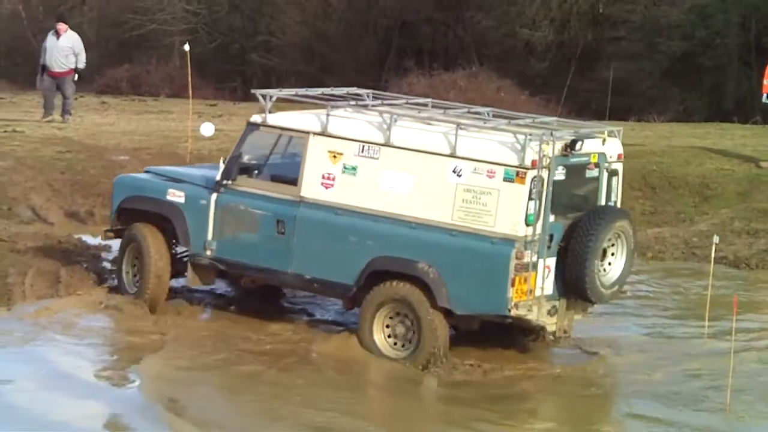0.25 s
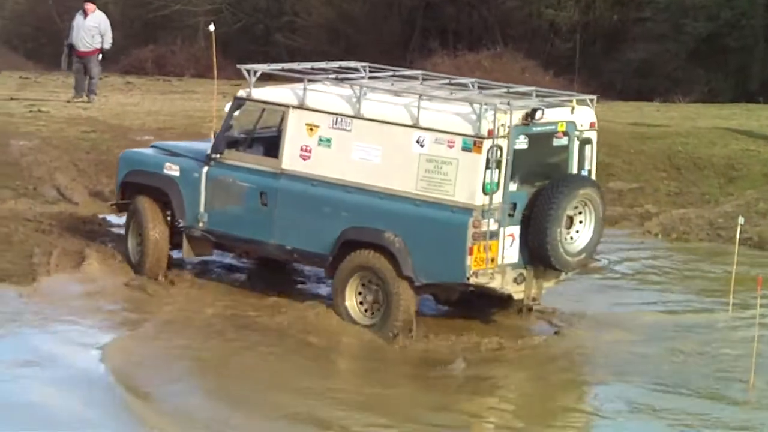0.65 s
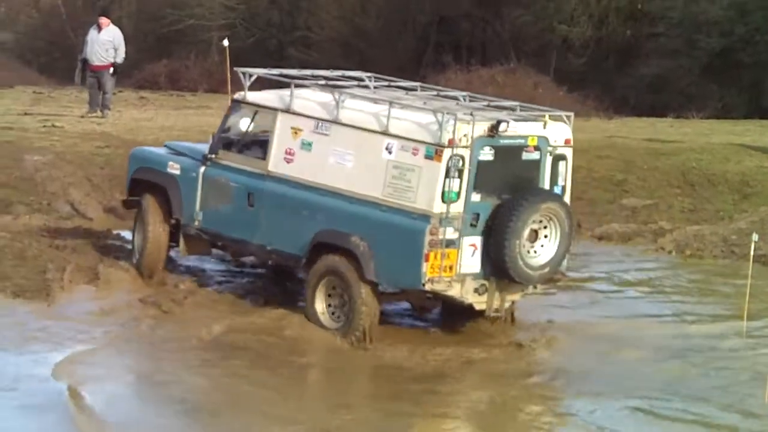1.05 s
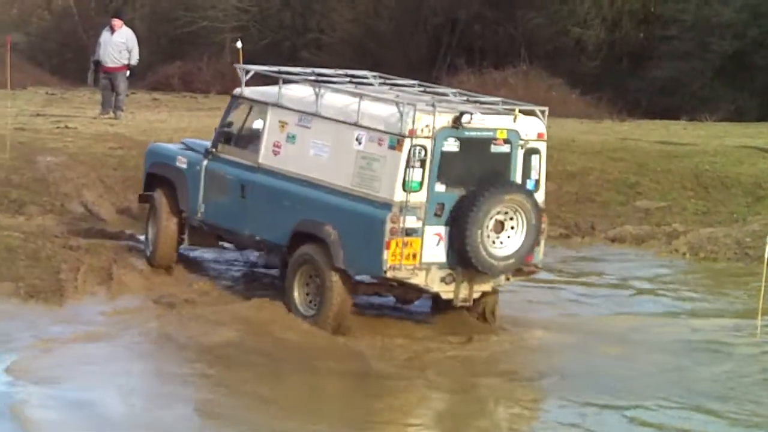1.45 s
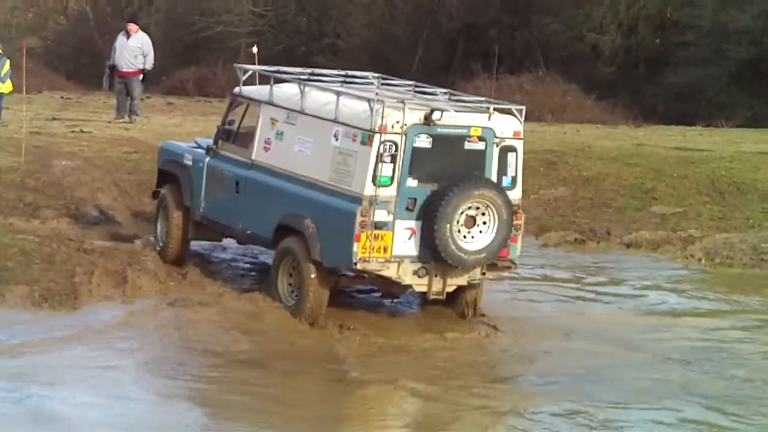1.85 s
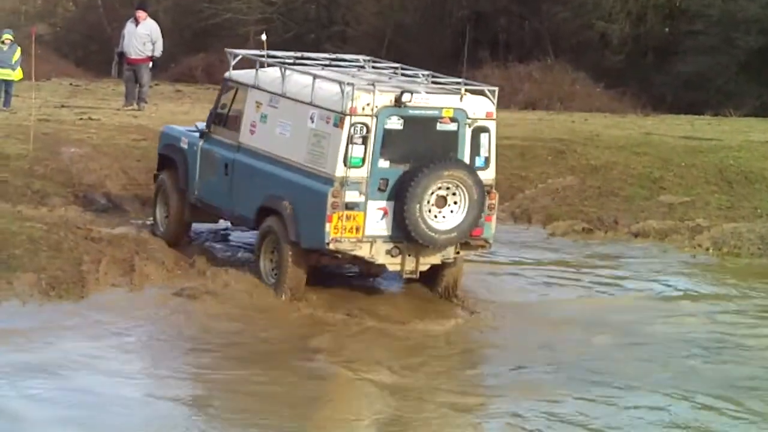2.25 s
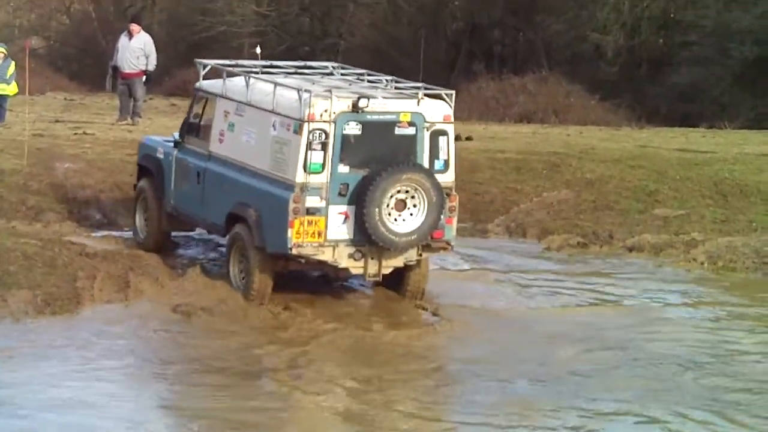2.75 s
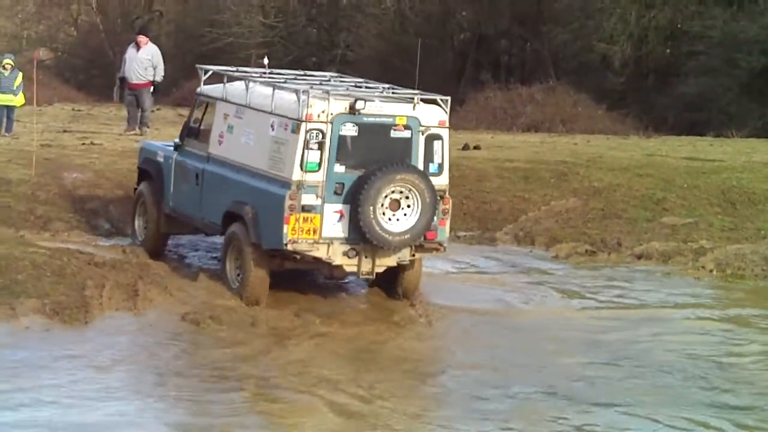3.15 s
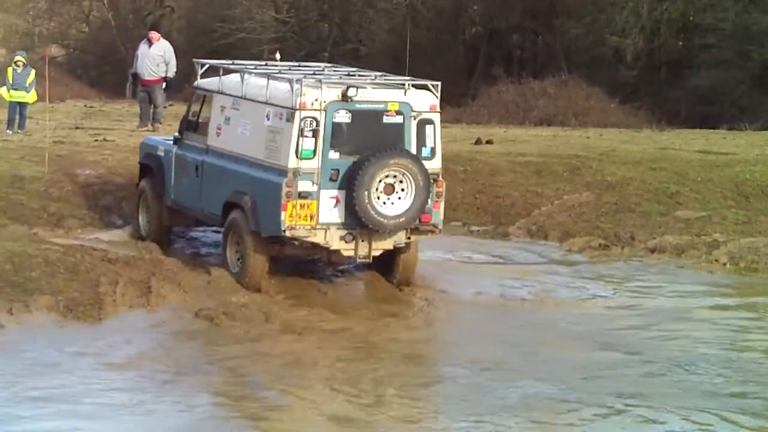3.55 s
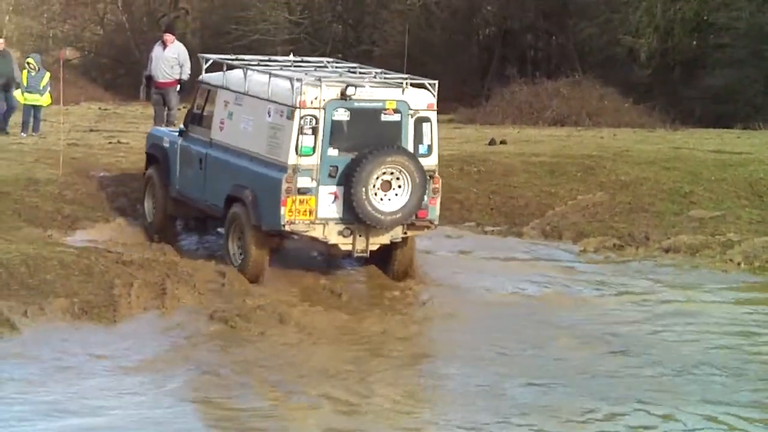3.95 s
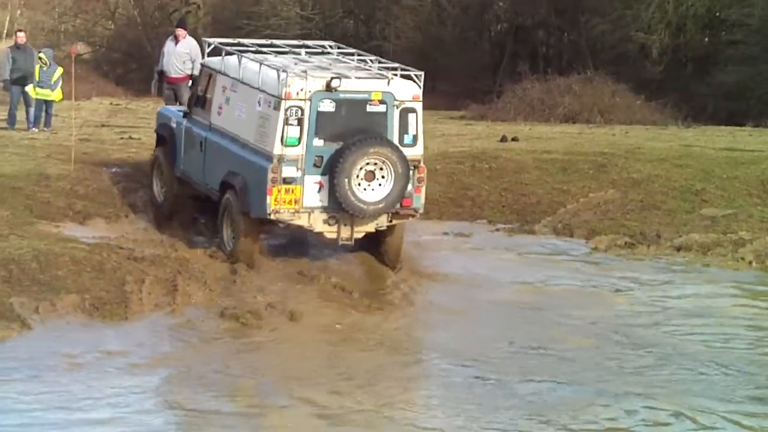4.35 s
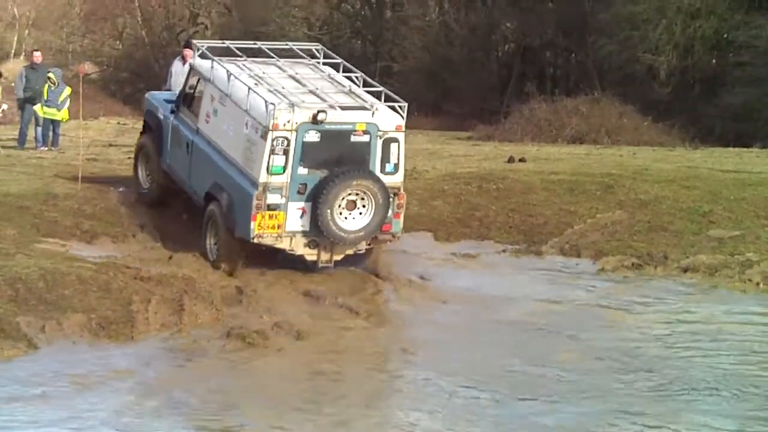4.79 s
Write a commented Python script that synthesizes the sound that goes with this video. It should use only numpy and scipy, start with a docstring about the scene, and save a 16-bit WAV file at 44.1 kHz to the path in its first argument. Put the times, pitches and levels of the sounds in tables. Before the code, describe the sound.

A small, dull, slightly overloaded microphone hears an old diesel working in shallow water: low exhaust throb, metallic rattle, rapid squeaky belt chirps, bubbling wash and spatter. Gusts buffet and crackle, mostly in the first half. The engine drops close to stalling, then picks up with sharp knocks, a louder throaty exhaust and surging water, and slackens a little last.

```python
"""At a muddy pond, a four-cylinder diesel off-roader wades out, slows almost to a stall, then revs up the bank.
Each firing sends a gas pulse through the exhaust and knocks on the engine block, and a wet belt chirps
once an engine cycle. Loose metal clinks. Bubbles, wash, spray and falling drops make the water.
A breeze rumbles and gusts buffet the small microphone, which flattens the loudest peaks."""
import sys
import numpy as np
from scipy import signal
from scipy.fft import rfft, irfft, next_fast_len
from scipy.io import wavfile
from scipy.ndimage import uniform_filter1d

SR = 44100
rng = np.random.default_rng(int(sys.argv[2]) if len(sys.argv) > 2 else 0)


def inscribe(sig):
    """Save sig as 16-bit PCM at rate SR to the path in sys.argv[1].

    A 1-D sig is mono; a 2-D sig holds one channel per row.
    Samples are clipped to [-1, 1] before scaling.
    """
    pcm = np.round(np.clip(np.atleast_2d(sig).T, -1, 1) * 32767)
    wavfile.write(sys.argv[1], SR, pcm.astype(np.int16))


N = 221509
T = np.arange(N) / SR  # time in seconds

# engine speed: time_s, firing_rate_hz
SPEED = [(0, 55.56), (.3, 55.86), (.5, 54.93), (.78, 54.25), (1, 54.09), (1.21, 57.85), (1.59, 57.99),
         (1.96, 54.72), (2.29, 56.33), (2.71, 45.48), (3.01, 41.93), (3.17, 35.88), (3.33, 32.18),
         (3.74, 42.46), (3.9, 52.87), (4.5, 68.71), (4.65, 66), (4.88, 60.3), (5.02, 59)]
# how far the driver opens the throttle: time_s, throttle (0 shut - 1 full)
THROTTLE = [(0, 0.39), (2.4, 0.27), (2.53, .05), (2.83, 0), (2.97, 0.33), (3.26, 0.12), (3.5, 0.61),
            (3.95, 0.64), (4.48, 0.9), (4.7, 0.39), (5.02, 0.44)]
# the vehicle turns away: time_s, tail_on (0 side on - 1 tailpipe towards the listener)
TAIL_ON = [(0, 0), (1.5, 0.38), (2.5, 0.68), (4.4, 0.63), (5.02, 1)]
BLOW_RISE_S = .0005  # time constant of the start of a blow or drop


def undb(db):
    """Turn decibels into a gain."""
    return 10 ** (np.asarray(db) / 20)


def curve(rows):
    """Join (time_s, value) rows by straight lines."""
    return np.interp(T, *np.transpose(rows))


def unit(x):
    """Scale to an rms level of 1."""
    return x / np.sqrt(np.mean(x ** 2))


def noise():
    """White noise: a steady hiss."""
    return rng.standard_normal(N)


def walk(rate_hz):
    """Slow random drift with an rms of 1; a higher rate wanders faster."""
    size = int(SR / rate_hz)
    smooth = uniform_filter1d(noise(), size)
    return unit(uniform_filter1d(smooth, size))


def colour(x, points):
    """Shape the tone through (pitch_hz, level_db) points, with no sound ahead of its cause."""
    hz, db = np.transpose(points)
    size = next_fast_len(N + SR // 2, True)
    f = np.maximum(np.fft.rfftfreq(size, 1 / SR), 1)
    gain = undb(np.interp(np.log(f), np.log(hz), db))
    # folding the cepstrum forward in time gives a minimum-phase filter
    cepstrum = irfft(np.log(gain), size)
    cepstrum[1:size // 2] *= 2
    cepstrum[size // 2 + 1:] = 0
    response = np.exp(rfft(cepstrum))
    return irfft(rfft(x, size) * response, size)[:N]


def butter(x, hz, kind, order):
    """Plain low-pass or high-pass filter."""
    return signal.sosfilt(signal.butter(order, hz, kind, fs=SR, output="sos"), x)


def steady(x):
    """Even out the slow changes of level to about 1."""
    power = uniform_filter1d(uniform_filter1d(x ** 2, SR // 10), SR // 10)
    return x / np.sqrt(power + 1e-12)


def swell(middle_s, length_s, edge_s):
    """Rise smoothly, hold and fall between 0 and 1."""
    return .5 + .5 * np.tanh((length_s / 2 - abs(T - middle_s)) / edge_s)


def burst(when_s, hz, width_hz, decay_s):
    """A struck part rings as a short band of noise that starts fast and dies away."""
    age = np.arange(SR // 20) / SR
    edges = [hz / (1 + width_hz / hz / 2), hz + width_hz / 2]
    sos = signal.butter(2, edges, "bandpass", fs=SR, output="sos")
    # drop the first half, where the filter is still settling
    band = signal.sosfilt(sos, rng.standard_normal(2 * len(age)))[len(age):]
    fade = (1 - np.exp(-age / BLOW_RISE_S)) * np.exp(-age / decay_s)
    band = band / np.sqrt(np.average(band ** 2, weights=fade ** 2))
    ring = band * fade / fade.max()
    return np.pad(ring, (int(when_s * SR), N))[:N]


def driven(law):
    """Level in dB from the throttle, the engine speed and the way the vehicle faces.

    A law holds: base_db (side on, throttle shut, 55 Hz firing rate), full_throttle_db,
    speed_db_per_octave, tail_on_db; the last three are changes.
    """
    base_db, throttle_db, octave_db, tail_db = law
    octaves = np.log2(curve(SPEED) / 55)
    return base_db + throttle_db * curve(THROTTLE) + octave_db * octaves + tail_db * curve(TAIL_ON)


def exhaust(turns, wobble_db=1.33, half_wobble_db=3.5, lead=-0.088, puff_db=-25):
    """Gas pulses, one a firing, ring the pipe; an open throttle strengthens their upper harmonics."""
    # shape of the gas pulses: multiple_of_firing_rate, level_db; the halves come from unequal cylinders
    order_levels = [(.5, -19.5), (1, -1.5), (1.5, -28), (2, 0), (2.5, -15), (3, -3.5), (3.5, -15), (4, -5),
                    (4.5, -24), (5, -13.5), (5.5, -30.5), (6, -16), (6.5, -20.5), (7, -22), (8, -17)]
    # tone of the exhaust pipe and silencer: pitch_hz, level_db
    pipe = [(20, -5), (35, -11.5), (45, 5.5), (56, 7), (70, 7), (90, 1.5), (112, 3.5), (132, 8), (152, 0.5),
            (174, 6), (207, 1), (226, -0.5), (246, 8.5), (268, -0.5), (295, -2.5), (450, -7), (800, -1)]
    # laws (columns in driven) for the whole exhaust, its firing-rate boom and its upper harmonics
    exhaust_law = (-37, 15, 2.5, 8.5)
    boom_law = (10.5, -15.5, 9, -8.5)
    bite_law = (1, 10.5, -7.5, -13.5)
    boom_db, bite_db = driven(boom_law), driven(bite_law)
    gas = 0
    for order, db in order_levels:
        # bite fades in between twice and three times the firing rate
        effort_db = boom_db if order == 1 else bite_db * np.clip(order - 2, 0, 1)
        unsteady_db = (half_wobble_db if order % 1 else wobble_db) * walk(5.7)
        wave = np.sqrt(2) * np.cos(2 * np.pi * order * (turns + lead))
        gas = gas + undb(db + effort_db + unsteady_db) * wave
    # turbulence leaves the pipe with each pulse
    puffs = noise() * (1 + np.cos(2 * np.pi * turns))
    puffs = butter(butter(puffs, 340, "lowpass", order=3), 160, "highpass", order=2)
    gas = gas + unit(puffs) * undb(puff_db + bite_db / 2)
    return colour(gas * undb(driven(exhaust_law)), pipe)


def rasp(turns, second_db=-5, weak_db=-6, scatter_db=0.0):
    """Each gas pulse has a hard edge and a softer one half a firing later; every other firing is weaker."""
    # tailpipe resonances: pitch_hz, level_db
    tailpipe = [(200, -11.5), (380, -4), (490, 5), (560, -4.5), (680, 6.5), (900, 6), (1100, -9.5),
                (1450, -3), (2000, -5.5), (3000, -17), (5000, -35)]
    # law of the rasp (columns in driven)
    rasp_law = (-47, 14, 8, 4)
    half = np.floor(2 * turns).astype(int)  # counts half firings
    clicks = np.diff(half, prepend=half[0])
    strength_db = second_db * (half % 2) + weak_db * (half // 2 % 2) + scatter_db * noise()[half]
    edges = clicks * undb(strength_db)
    return steady(colour(edges, tailpipe)) * undb(driven(rasp_law))


def clatter(turns, hz, lag_s=0.00084, scatter_db=-1.0, grain_db=2, valve_db=4, knock_hz=1800, knock_spread_hz=520):
    """Each firing knocks on the block; valves and injectors rattle in between and panels ring."""
    # tone of the engine block and bay: pitch_hz, level_db (per Hz)
    block = [(120, -27), (300, 8.5), (500, -1), (750, 2.5), (940, 5.5), (1080, -8), (1350, 0.5),
             (1750, 2.5), (2050, -1), (2450, -2), (3600, -8.5), (4500, -17.5), (6200, -19.5), (7500, -41.5)]
    # panels that ring with the engine: pitch_hz, width_hz, level_db
    panels = [(933, 26, -15), (1318, 76, -11.5), (1730, 150, -20.5), (2170, 40, -15.5)]
    # laws (columns in driven) for all the clatter, and for the knock before it joins the rattle
    clatter_law = (-28, 9.5, 7.5, -8.5)
    knock_law = (-12, 5.5, -6, 6)
    knock_s = .0045  # how soon a knock fades
    turns = turns - lag_s * hz
    age = turns % 1 / hz  # seconds since the last firing
    force = undb(scatter_db * noise()[np.floor(turns).astype(int)])
    # a wandering pitch keeps the ring even in strength, with no clear note
    ring = np.sin(2 * np.pi * np.cumsum(knock_hz + knock_spread_hz * walk(2400)) / SR)
    blows = force * np.exp(-(age / knock_s) ** 2) * ring
    knock = steady(colour(blows, block)) * undb(driven(knock_law))
    valves = np.cos(4 * np.pi * turns)  # two valves seat for each firing
    drive = undb(grain_db * walk(300) + valve_db * curve(THROTTLE) * valves) * noise()
    rattle = unit(colour(drive, block))
    for f, width, db in panels:
        panel = signal.lfilter(*signal.iirpeak(f, f / width, fs=SR), drive)
        rattle = rattle + undb(db) * unit(panel)
    return steady(knock + rattle) * undb(driven(clatter_law))


def hard_knocks(ring_hz=1800, width_hz=1200, decay_s=0.0036):
    """Some firings crack against the block, each a short burst of ringing noise."""
    # firings that knock harder than the rest: time_s, level_db
    knock_rows = [(1.464, -31), (1.532, -27), (1.572, -30), (1.653, -24), (1.672, -29), (1.759, -32),
                  (1.813, -24), (1.866, -27.5), (1.939, -25), (1.998, -28), (3.329, -25.5), (3.36, -23.5),
                  (3.418, -26.5), (3.447, -26), (3.478, -29), (3.504, -24.5), (3.531, -25), (3.558, -24),
                  (3.584, -26.5), (3.61, -27), (3.634, -26), (3.659, -23), (3.684, -21.5), (3.707, -23.5),
                  (3.755, -18), (3.798, -20), (3.82, -20), (3.839, -25), (3.878, -21.5), (3.896, -32),
                  (3.919, -23), (4.026, -19.5), (4.096, -19), (4.129, -22), (4.262, -23.5), (4.277, -22),
                  (4.301, -25), (4.417, -29), (4.447, -26), (4.476, -23)]
    return sum(undb(db) * burst(when, ring_hz, width_hz, decay_s) for when, db in knock_rows)


def belt(turns, offset=0.39, tug_db=3.5, evenness=0.98):
    """The wet belt scrapes its pulleys into a rough chirp once an engine cycle, tugged by each firing."""
    # ringing pulleys: pitch_hz, width_hz, level_db, swing_db (up and down over the engine cycle)
    pulleys = [(1456, 31, -2.5, 4), (958.6, 32, -11, 5.5), (1828, 190, -10.5, 3)]
    # times when the belt slips: start_s, end_s, level_db (side on)
    slips = [(-.1, 0.74, -24.5), (.75, 1.52, -24.5), (1.5, 2.41, -26), (2.96, 3.12, -23),
             (4.08, 4.6, -24.5), (4.661, 5.8, -19)]
    slip_edge_s, hidden_db = 0.021, -12.5  # fade of a slip; change of level when tail on
    cycle = np.tanh(2 * np.cos(2 * np.pi * (turns / 4 + offset)))  # four firings make a cycle
    tug = tug_db * np.cos(2 * np.pi * turns)
    chirp = 0
    for hz, width, db, swing_db in pulleys:
        band = butter(noise(), hz - width / 2, "highpass", order=4)
        band = butter(band, hz + width / 2, "lowpass", order=4)
        ring = signal.lfilter(*signal.iirpeak(hz, hz / width, fs=SR), signal.hilbert(band))
        # friction limits the swing
        ring = ring.real / (abs(ring) + 1e-9) ** evenness
        chirp = chirp + undb(db) * unit(ring * undb(swing_db * cycle + tug))
    slip = 0
    for start, end, db in slips:
        slip = slip + undb(db) * swell((start + end) / 2, end - start, slip_edge_s)
    return slip * chirp * undb(hidden_db * curve(TAIL_ON))


def clinks(width_hz=450):
    """Loose fittings on the chassis clack, each a short burst of ringing noise."""
    # loose metal: time_s, level_db, pitch_hz
    clink_rows = [(0.825, -22, 2260), (.842, -21, 1750), (0.911, -29, 1830), (3.445, -21, 3510),
                  (3.609, -25, 3520), (3.634, -29, 3550), (4.356, -19, 2300)]
    return sum(undb(db) * burst(when, hz, width_hz, decay_s=.0035) for when, db, hz in clink_rows)


def water(count=4000, low_hz=480, high_hz=4000, cycles=5, spread_db=3, wash_db=0, surge_db=1.85, spray_db=-15):
    """Short bubbles that rise in pitch over a surging wash, with fine spray off the tyres."""
    # law of the water (columns in driven)
    water_law = (-37.5, 8.5, 3.5, 3.5)
    bubbles = np.zeros(N + SR)
    for when, size, chance in rng.random((count, 3)):
        hz = low_hz * (high_hz / low_hz) ** size
        age = np.arange(int(4 * cycles * SR / hz)) * hz / SR  # in periods
        bubble = np.exp(-age / cycles) * np.sin(2 * np.pi * age * (1 + 0.059 * age / cycles))
        start = int(when * N)
        # a few bubbles are much louder than the rest
        bubbles[start:start + len(age)] += bubble * undb(-spread_db * np.log(0.015 + chance))
    wash_tone = [(150, -11.0), (600, 5.0), (1500, -1.0), (3000, -2.0), (6000, -17.5), (8000, -60.0)]
    spray_tone = [(1500, -27.5), (3500, 4.5), (4600, -7.0), (6200, -19.0), (7500, -50.0)]
    wash = unit(colour(noise(), wash_tone))
    spray = unit(colour(noise(), spray_tone))
    churn = unit(bubbles[:N]) + undb(wash_db) * wash
    churn = unit(churn * undb(surge_db * walk(24)))
    return (churn + undb(spray_db) * spray) * undb(driven(water_law))


def spatter(count=900, low_hz=2300, high_hz=5500, ring_s=0.013, spread_db=4, level_db=-47, tail_on_db=-3):
    """Drops flung off the tyres patter on the pond as tiny fading rings, softer as the vehicle turns away."""
    drops = np.zeros(N + SR)
    age = np.arange(SR // 50) / SR
    fade = (1 - np.exp(-age / BLOW_RISE_S)) * np.exp(-age / ring_s)
    for when, size, chance in rng.random((count, 3)):
        hz = low_hz * (high_hz / low_hz) ** size
        drop = fade * np.sin(2 * np.pi * hz * age)
        loudness = (low_hz / hz) ** 2 * undb(-spread_db * np.log(0.014 + chance))
        start = int(when * N)
        drops[start:start + len(age)] += drop * loudness
    return unit(drops[:N]) * undb(level_db + tail_on_db * curve(TAIL_ON))


def wind(ragged_db=2.5, crackle_db=-17, wake_db=-12, wake_s=0.041):
    """The breeze rumbles low; gusts hit the microphone as ragged bursts of eddies that trail off in a wake."""
    # rumble that blows, eases, returns and drops to a lull: time_s, level_db
    breeze = [(0, -16), (1.3, -14), (1.45, -17.5), (2, -21.5), (2.15, -19), (2.55, -17), (2.8, -23.5),
              (3.6, -24), (5.02, -23)]
    # buffets: middle_s, length_s, level_db (of the eddies), corner_hz (upper limit of the eddies)
    gusts = [(0.152, 0.02, -11.5, 221), (0.188, 0.034, -11, 215), (0.236, 0.023, -5, 270),
             (0.267, 0.03, -10, 264), (0.303, 0.017, -7.5, 200), (0.361, 0.011, -9, 259),
             (0.45, 0.055, -8, 97), (0.538, 0.039, -11, 190), (0.599, 0.048, -15, 213),
             (0.644, 0.053, -9.5, 275), (0.689, 0.02, -9.5, 265), (1.037, 0.011, -10, 295),
             (1.077, 0.018, -9, 266), (1.199, 0.063, -5, 148), (1.233, 0.075, -6, 215),
             (1.277, 0.044, -3.5, 332), (1.365, 0.028, -14, 79), (1.584, 0.031, -11, 60),
             (2.1, 0.063, -10, 172), (2.133, 0.0088, -9, 358), (2.16, 0.018, -8, 384),
             (2.19, 0.045, -10.5, 219), (2.248, 0.039, -7.5, 213), (2.285, 0.04, -5, 219),
             (2.322, 0.032, -8.5, 196), (2.374, 0.089, -17.5, 139.4), (2.535, 0.041, -11, 70),
             (3.443, 0.017, -10.5, 45.5), (4.094, 0.062, -13, 44.3)]
    sway_db, edge_share = 1, .1  # drift of the breeze; edge time of a buffet as a share of its length
    rumble_tone = [(8, -21.5), (20, 1.0), (50, -3.5), (90, -4.0), (160, -5.5), (250, -14.0), (400, -34.5), (1000, -55.0)]
    crackle_tone = [(150, -18.5), (350, 2), (650, -7), (900, -15.0), (1500, -8.5), (4000, -51.5)]
    rumble = steady(colour(noise(), rumble_tone))
    out = rumble * undb(curve(breeze) + sway_db * walk(2.8))
    ragged = undb(ragged_db * walk(30))
    # the smallest eddies come in sputters
    crackle = unit(colour(noise() * undb(4.2 * walk(82)), crackle_tone))
    for middle, length, db, corner_hz in gusts:
        eddies = butter(noise(), corner_hz, "lowpass", order=3)
        eddies = ragged * butter(eddies, corner_hz / 4, "highpass", order=2)
        gate = swell(middle, length, length * edge_share)
        eddies = eddies / np.sqrt(np.average(eddies ** 2, weights=gate))
        wake = undb(wake_db) * (T > middle) * np.exp(-abs(T - middle) / wake_s)
        # buffets that reach higher also crackle more
        buffet = eddies + crackle * undb(crackle_db) * corner_hz / 220
        out = out + undb(db) * np.maximum(gate, wake) * buffet
    return out


def slaps():
    """Steep fronts of hard eddies slap the microphone, each a quick push and pull of pressure."""
    # slaps: time_s, peak_db, centre_hz
    slap_rows = [(0.23, -9.5, 420), (.276, -7.5, 440), (0.686, -7.5, 420), (1.265, -13, 600),
                 (2.131, -4, 560), (2.152, -4, 520), (2.276, -12.5, 480), (2.319, -8.5, 400)]
    out = 0
    for when, db, hz in slap_rows:
        angle = 2 * np.pi * hz * (T - when)
        out = out - undb(db) * angle * np.exp((1 - angle ** 2) / 2)
    return out


def scene(firing_s=3.445):
    """The crankshaft times exhaust, rasp, clatter and belt; the other sounds keep their own time."""
    hz = curve(SPEED)
    turns = np.cumsum(hz) / SR  # counts firings
    turns = turns - np.interp(firing_s, T, turns)  # start the count at this moment
    turns = turns + .007 * walk(29)  # uneven firings, in firing periods
    engine = exhaust(turns) + rasp(turns) + clatter(turns, hz) + hard_knocks() + belt(turns)
    return (engine + clinks() + water() + spatter() + wind() + slaps())[None]


def record(dry, ceiling=0.58, knee=7):
    """The microphone stage flattens the peaks, dulls the treble and cuts off the top."""
    clipped = dry / (1 + abs(dry / ceiling) ** knee) ** (1 / knee)
    dull = butter(clipped, 3870, "lowpass", order=2)
    cut_hz = 6900
    return signal.sosfilt(signal.ellip(8, .2, 80, cut_hz, fs=SR, output="sos"), dull)


dry = scene()
out = record(dry)
inscribe(out)
```